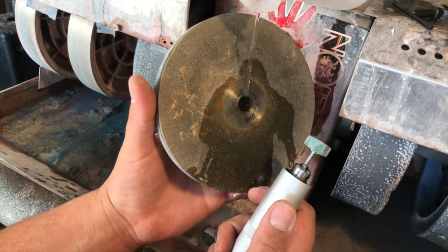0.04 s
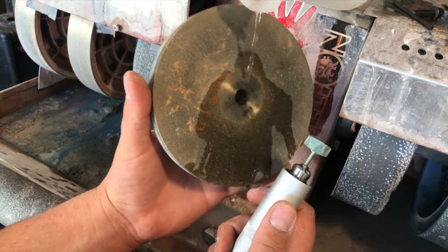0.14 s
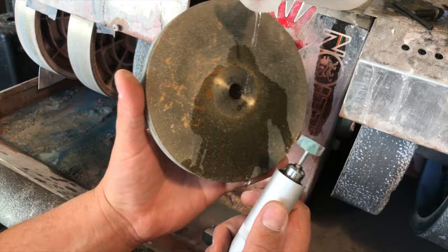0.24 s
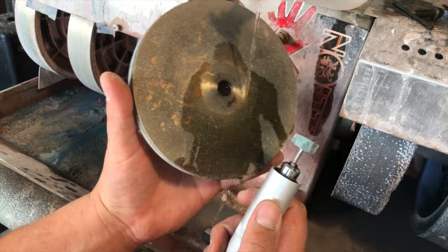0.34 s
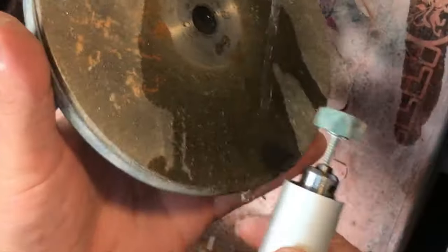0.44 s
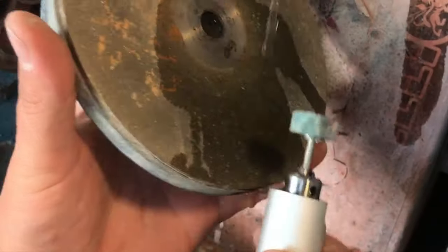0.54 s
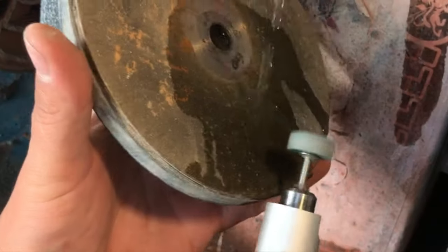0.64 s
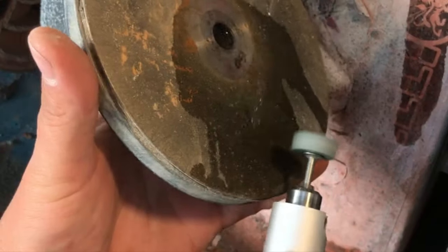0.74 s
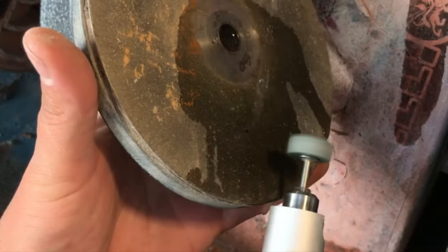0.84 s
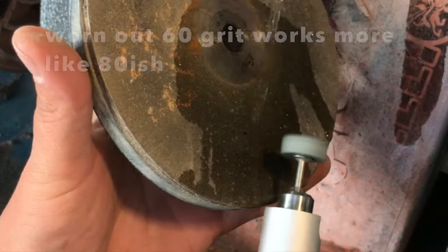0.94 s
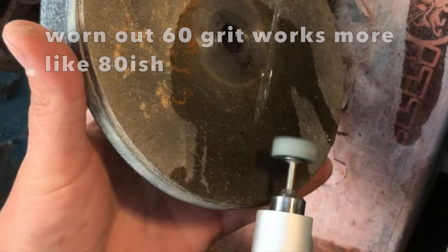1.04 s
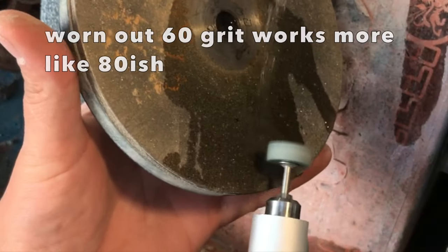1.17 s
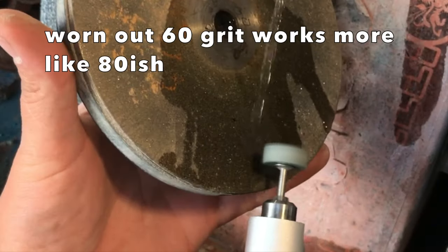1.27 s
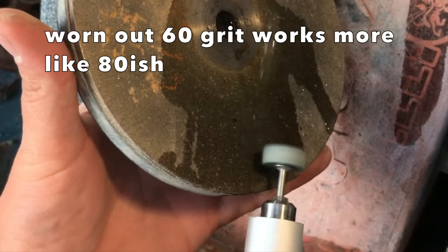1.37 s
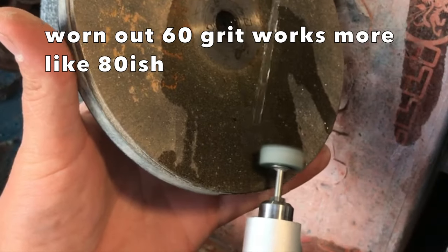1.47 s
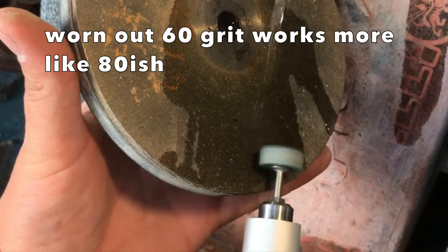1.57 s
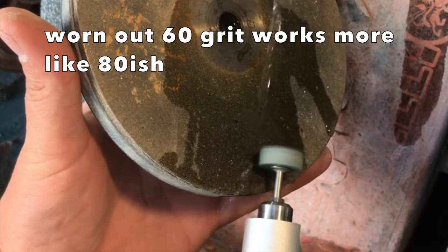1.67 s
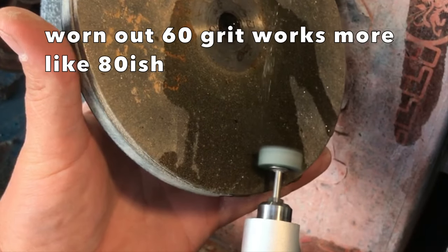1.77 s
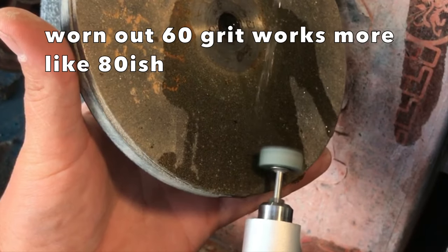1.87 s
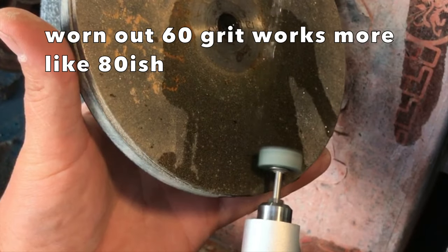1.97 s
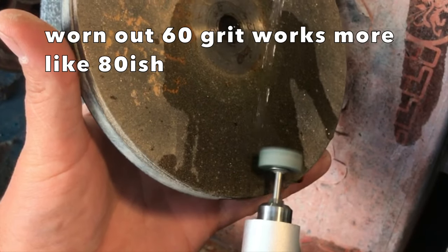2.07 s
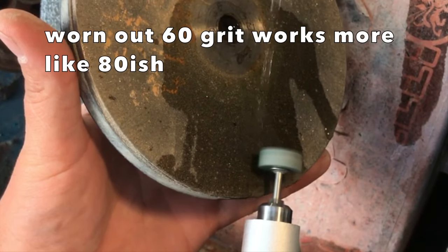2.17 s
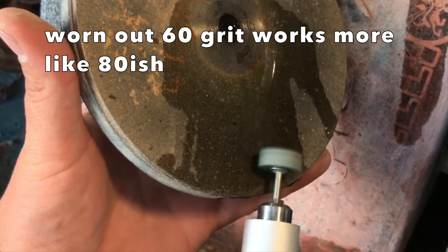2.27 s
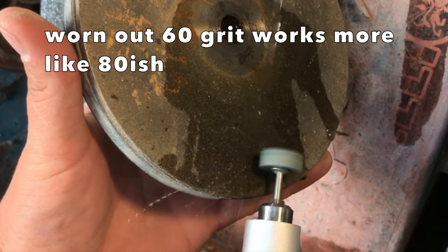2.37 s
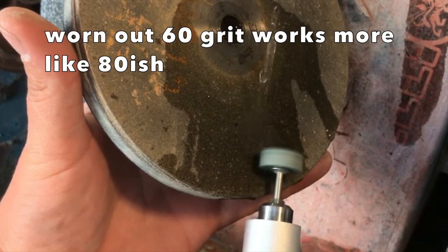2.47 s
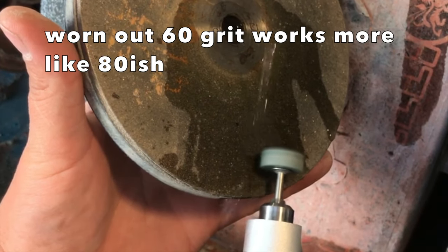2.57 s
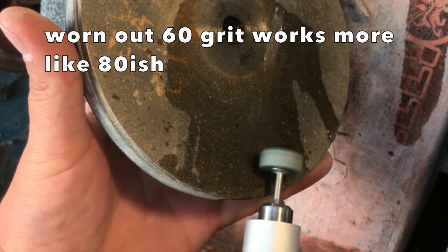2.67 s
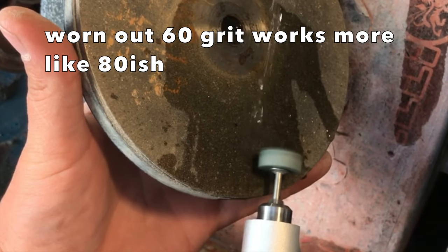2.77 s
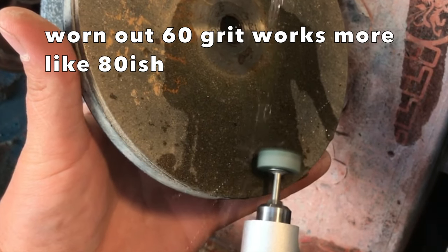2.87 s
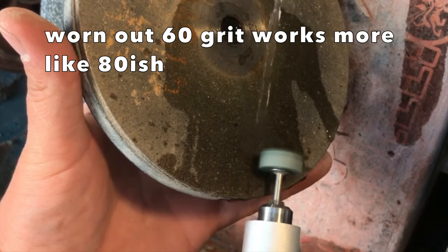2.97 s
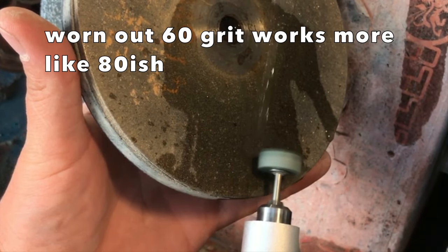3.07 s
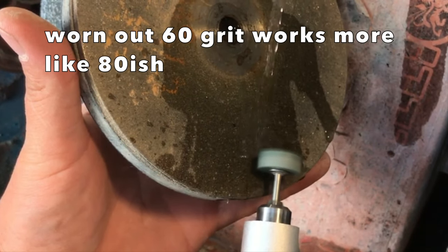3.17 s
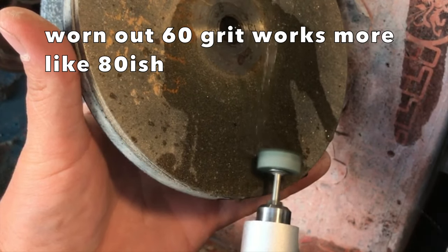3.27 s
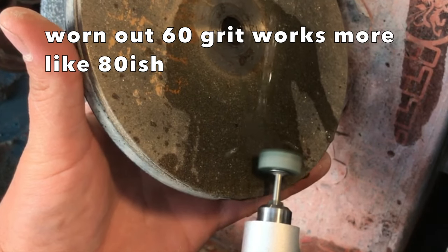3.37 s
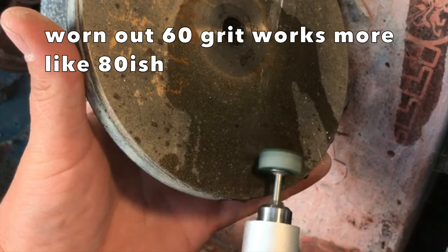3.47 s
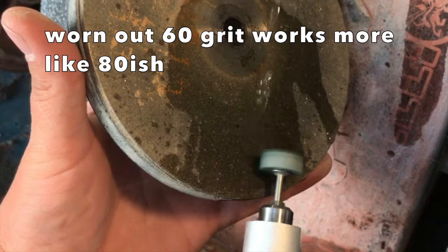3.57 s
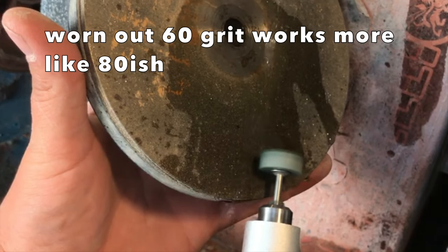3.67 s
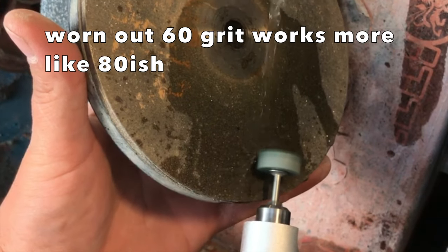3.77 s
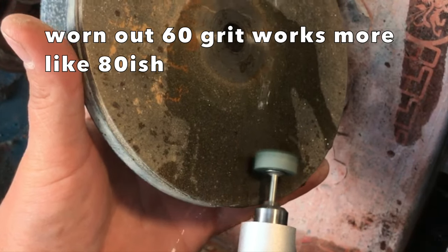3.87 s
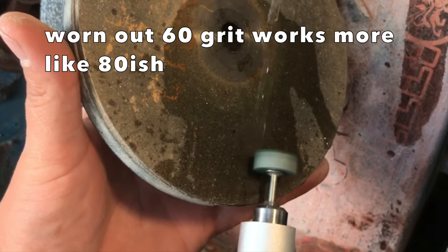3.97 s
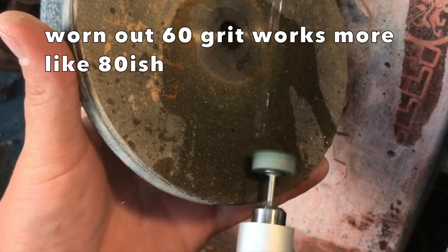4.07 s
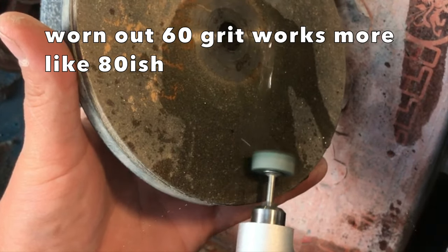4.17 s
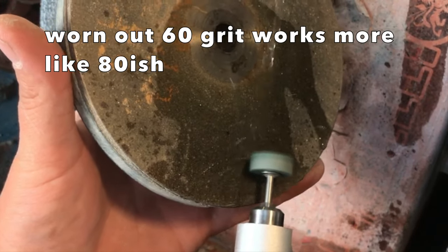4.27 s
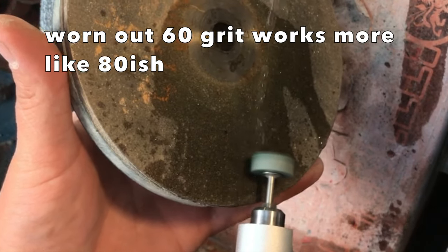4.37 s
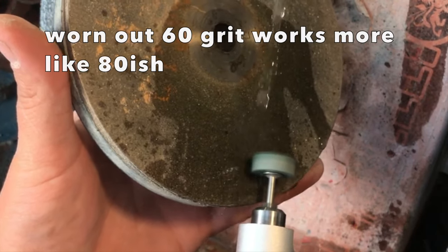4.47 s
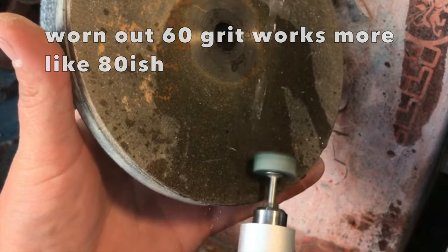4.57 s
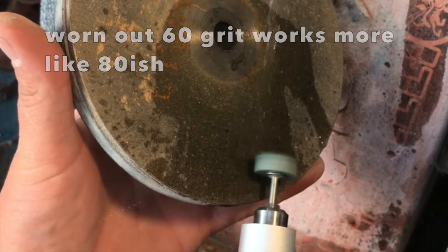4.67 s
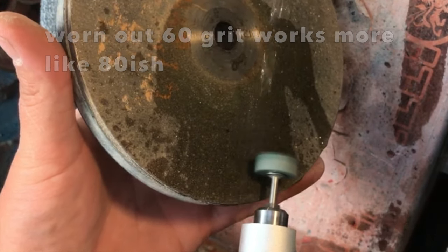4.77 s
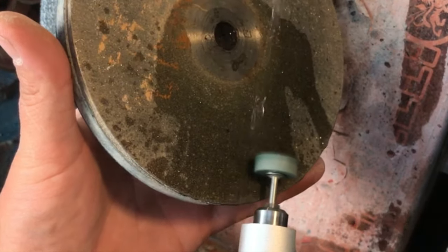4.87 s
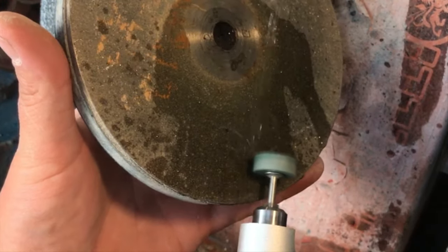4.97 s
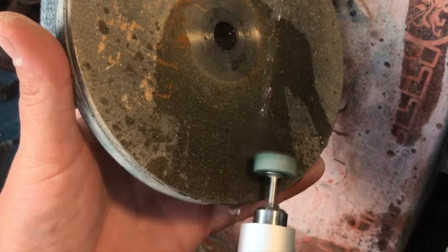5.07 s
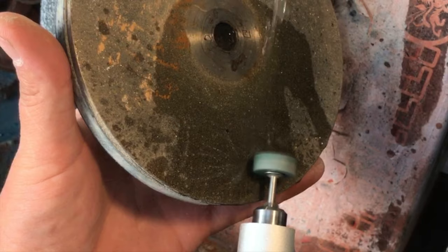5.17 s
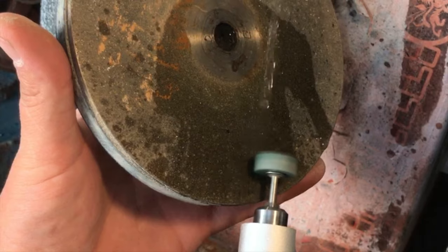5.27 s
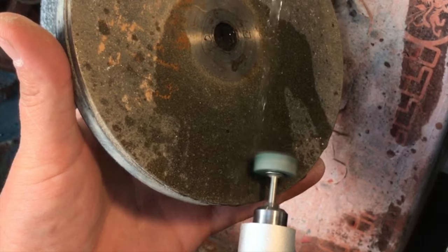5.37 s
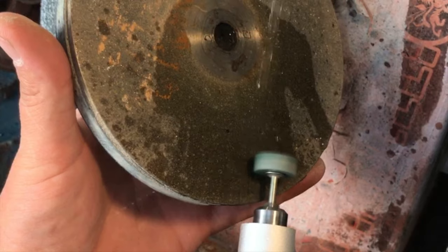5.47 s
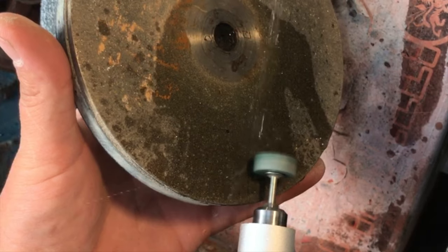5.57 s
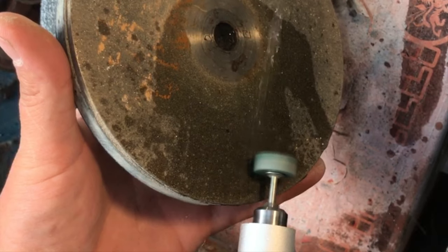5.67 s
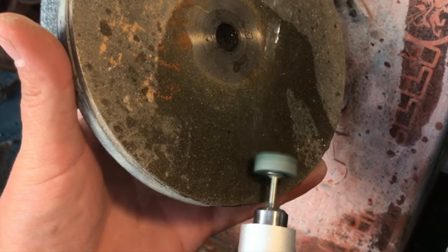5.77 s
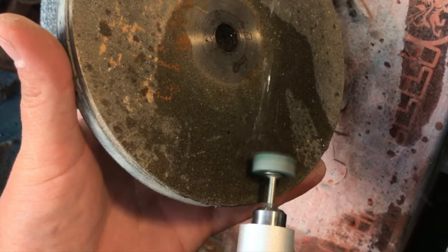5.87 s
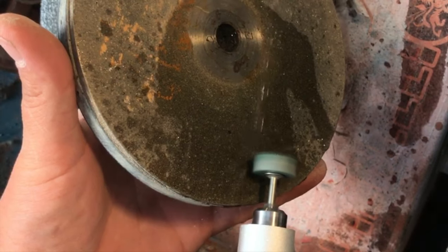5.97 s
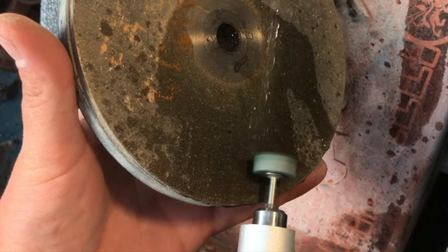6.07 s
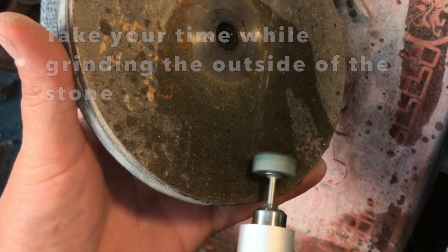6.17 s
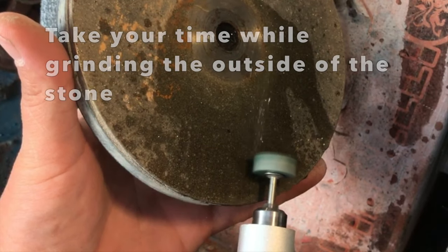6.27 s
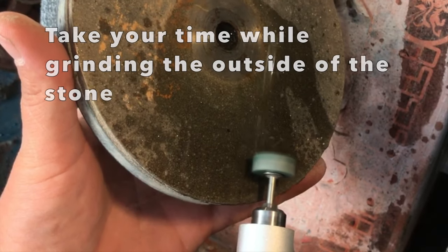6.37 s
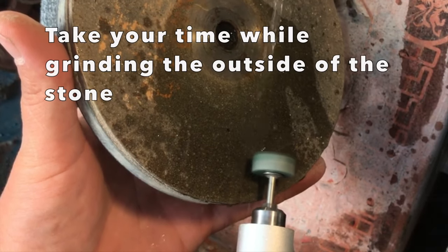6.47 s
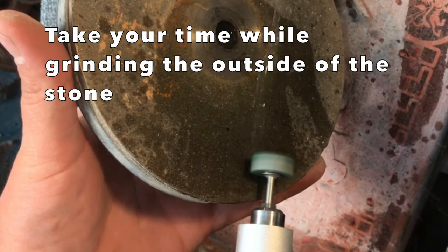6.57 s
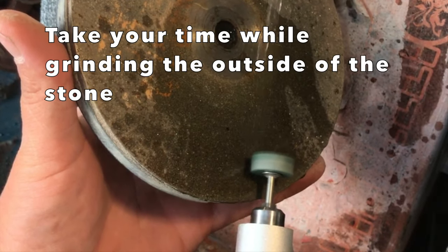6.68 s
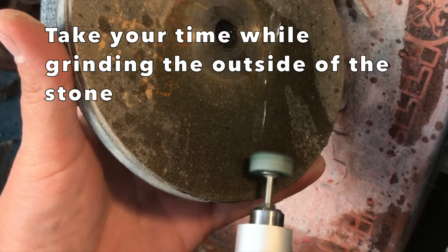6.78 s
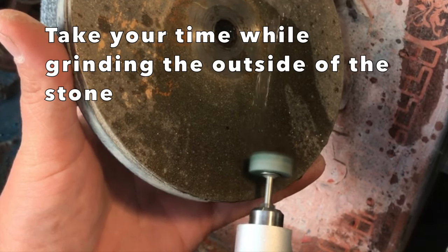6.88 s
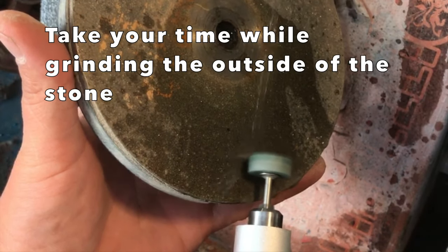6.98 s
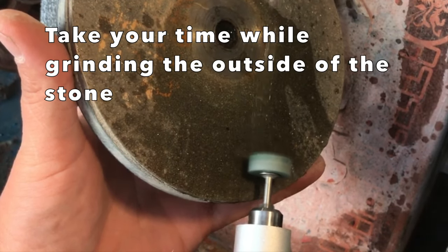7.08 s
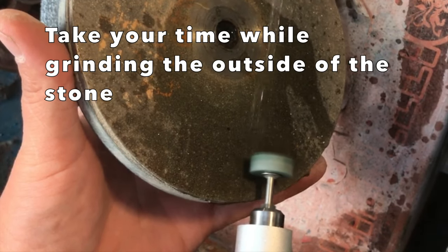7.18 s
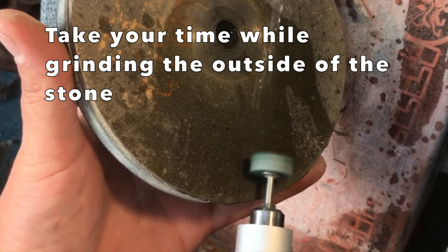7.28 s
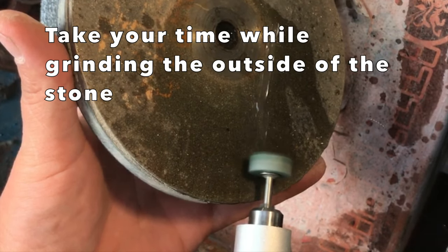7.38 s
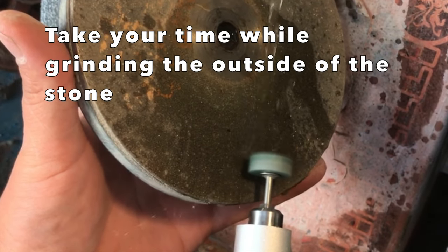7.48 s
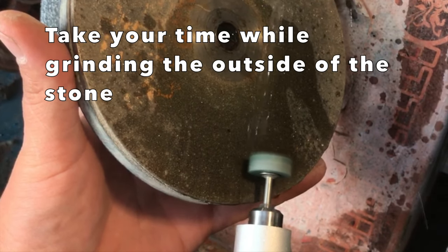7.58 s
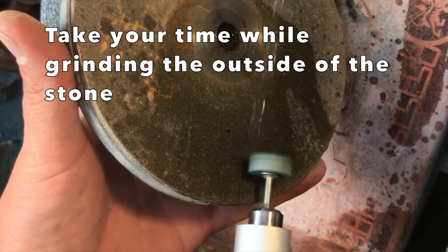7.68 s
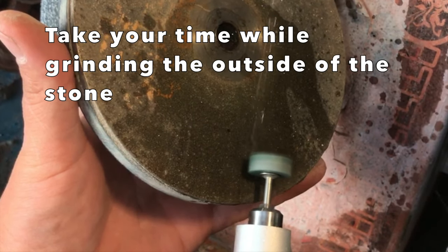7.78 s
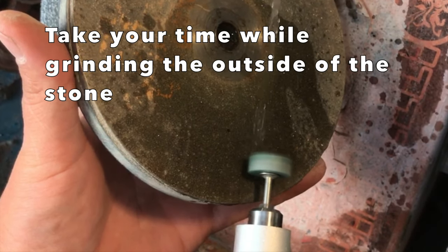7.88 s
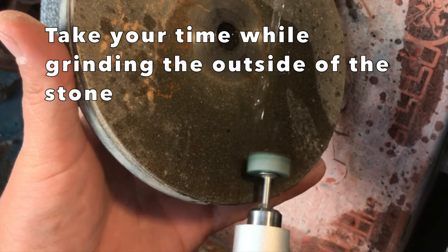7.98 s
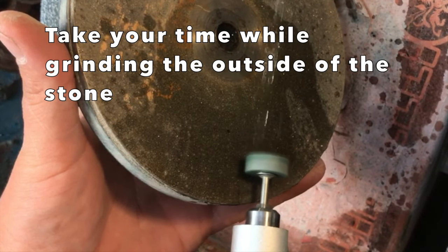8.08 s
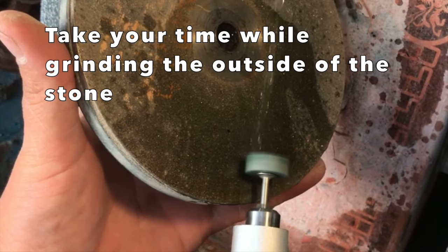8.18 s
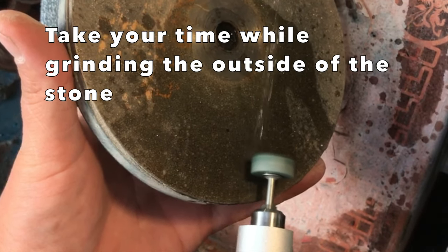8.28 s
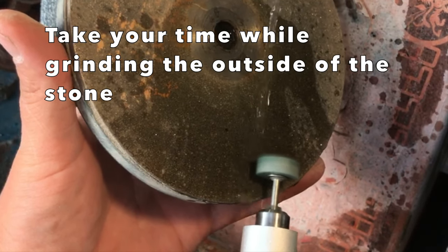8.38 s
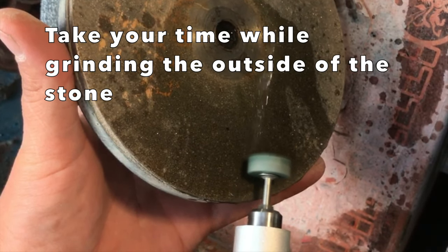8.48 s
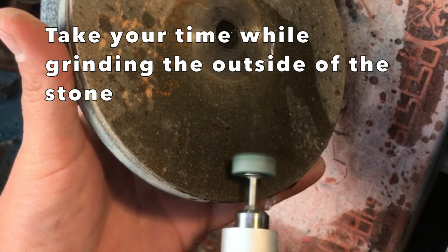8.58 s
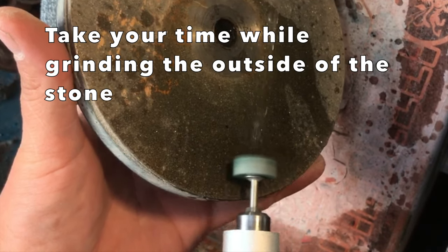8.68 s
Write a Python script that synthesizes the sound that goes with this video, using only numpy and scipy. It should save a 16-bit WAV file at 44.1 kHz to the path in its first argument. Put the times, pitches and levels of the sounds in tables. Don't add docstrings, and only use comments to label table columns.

```python
import sys
import numpy as np
from scipy import signal
from scipy.io import wavfile

SR = 44100
rng = np.random.default_rng(int(sys.argv[2]) if len(sys.argv) > 2 else 0)


def volts(x):
    e = np.asarray(x, float) / 20
    return 10 ** e


def bounce(signal):
    frames = np.transpose(np.atleast_2d(signal))
    limited = np.clip(frames, -1, 1)
    pcm = np.round(limited * 32767).astype(np.int16)
    wavfile.write(sys.argv[1], SR, pcm)


N = 384552
T = np.arange(N) / SR

# [f/Hz, level/dB, t60/s]
KNOCK_MODES = [(1560, -45, 0.11), (1659, -3, 0.066), (1713, -3.5, 0.058), (2020, -34, 0.088),
               (2033, -2.5, 0.058), (2390, -6, 0.027), (2530, 8, .014), (2398, 5, 0.016),
               (2497, 0.5, 0.022), (2716, 6, 0.027), (2890, -5, 0.029), (3160, -20, 0.056),
               (3500, 1, 0.021)]
# [f/Hz, level/dB, t60/s]
PLATE_MODES = [(3708, -10, 0.11), (4230, -1.5, 0.022), (4910, -1.5, 0.025), (4970, -8, .03),
               (5370, -26, 0.087), (6000, 3, 0.013), (6205, -3.5, 0.038), (6910, 1.5, 0.0075),
               (7720, -9, 0.028), (8120, 0, 0.025), (8590, -4, 0.052), (9130, -3.5, 0.026),
               (9460, 0, 0.035),
               (10400, -2, 0.03), (11110, -2.5, 0.025), (11270, -4.5, .025), (12760, -2.5, 0.03),
               (12880, -1.5, .025), (13320, -5, .03), (13460, 0, 0.035), (13590, -7, .03), (13690, -5, .03),
               (13850, -11, .02), (15170, -6, 0.02), (15400, -6, 0.02), (15700, -5, .02)]
# [t/s, knock level/dB]
HAND_WEIGHT = [(1.85, -37), (1.97, -30), (2.45, -27), (2.75, -36.5), (2.95, -29.5), (3.4, -36), (3.55, -31),
               (3.72, -29), (3.86, -36), (4.45, -37.5), (4.6, -32.5), (5.0, -31), (5.46, -29),
               (5.85, -31.5), (6.05, -29.5), (7.0, -30), (7.45, -28), (8.1, -32.5)]
# [f/Hz, level/dB per Hz]
SCRAPE_COLOUR = [(530, -25), (900, -56), (1670, 10.5), (1860, -4), (2400, 11.5), (3940, 4), (13200, 6),
                 (16200, -10)]


def grinding(turns):
    strike_s, scrape_db, missed_db = bouts(turns)
    at = np.round(strike_s * SR).astype(int)
    scrape_db = scrape_db + missed_db
    knock_db = columns(HAND_WEIGHT)[0][at] + 0.9 * rng.standard_normal(len(at)) + missed_db
    out = np.zeros(N + 40)
    landing_s = 0.00038
    soft = 1 - np.exp(-np.arange(3000) / SR / landing_s)
    # modes, blow level/dB, change of level with landing spot/dB, spread of delay/samples, onset
    mode_groups = (
        (KNOCK_MODES, knock_db - 11.5, 1.2, 1, soft),
        (PLATE_MODES, scrape_db - 16.0, 2.0, 14, 1))
    for modes, size_db, spot_db, spread, onset in mode_groups:
        for hz, db, t60 in modes:
            late = rng.integers(0, spread) + (hz > 3500) * rng.integers(0, 4, len(at))
            blow_db = size_db + spot_db * rng.standard_normal(len(at))
            blows = np.bincount(at + late, volts(blow_db), len(out))
            out += signal.oaconvolve(blows, volts(db) * ring(hz, t60) * onset)[:len(out)]
    t = np.arange(2000) / SR
    contact = volts(-60 * t / 0.014) + 0.12 * volts(-60 * t / 0.08)
    scrapes = np.bincount(at, volts(scrape_db), len(out))
    grit = signal.oaconvolve(scrapes, contact)[:N] * rng.standard_normal(N)
    struck = out[:N] + volts(-9.5) * coloured(grit, SCRAPE_COLOUR)
    return band(struck, lo_hz=1400, hi_hz=19200, order=3)


# [first strike t/s, length/s, flight/turns, scrape level/dB]
BOUNCES = [(1.5773, .07, 19, -23.5), (1.687, .015, 4.5, -27), (1.7566, .036, 6.5, -27),
           (1.8501, .013, 4.3, -25), (1.9289, .065, 7.5, -25.5), (2.002, .05, 5.3, -23),
           (2.0649, .062, 5.6, -25), (2.1326, .08, 7, -24), (2.2206, .055, 5.1, -25.5),
           (2.2881, .095, 7.25, -23), (2.3984, .095, 7.3, -24), (2.5109, .06, 7.2, -24),
           (2.5858, .07, 8.9, -24.5), (2.6904, .12, 7, -26.5), (2.8833, .165, 6.6, -27),
           (3.0863, .015, 5.4, -28), (3.1785, .05, 18, -25.5), (3.2451, .057, 4.4, -23.5),
           (3.3387, .03, 9, -26), (3.3757, .065, 6, -29), (3.4741, .27, 5.6, -27),
           (3.7524, .04, 6.5, -23.5), (3.8066, .1, 7.5, -21.5), (3.9907, .118, 6.7, -25),
           (4.1768, .022, 8, -22), (4.3573, .045, 15, -24), (4.4109, .11, 8.5, -21.5),
           (4.5318, .225, 4.1, -25), (4.7643, .115, 6.5, -28.5), (4.8891, .14, 5, -25)]
# [start t/s, flight/turns, scrape level/dB]
CHATTER = [(5.04, 4, -25.5), (5.14, 3.34, -26), (5.3, 4, -24.5), (5.49, 3.66, -24.5), (5.7, 3.9, -26),
           (5.82, 4.5, -23.5), (6.04, 4.5, -24.5), (6.13, 4, -23.5), (6.24, 3.95, -27.5), (6.294, 3.4, -23),
           (6.466, 3.6, -24), (6.68, 3.45, -23.5), (6.775, 4.3, -29.5), (6.88, 4.4, -21),
           (6.97, 4.6, -24.5), (7.02, 4.4, -22), (7.135, 4.9, -35), (7.195, 3.7, -24.5), (7.4, 3.96, -23.5),
           (7.575, 2.8, -23.5), (7.61, 4.04, -24), (7.705, 2.8, -20.5), (7.75, 5, -33), (7.775, 3.6, -22),
           (7.82, 2.8, -45), (7.853, 3.8, -22.5), (8.1, 3.5, -24.5), (8.275, 3.9, -26.5),
           (8.36, 3.5, -24.5), (8.55, 3.9, -22.5)]


def bouts(turns):
    start, length, flight, db = np.transpose(BOUNCES)[:, :, None]
    first, last = np.interp([start, start + length], T, turns)
    light = strikes(first, last, flight, db, turns, slip=.18, spread_db=2.1, count=24)
    start, flight, db = np.transpose(CHATTER)[:, :, None]
    first = np.round(np.interp(start, T, turns))
    last = np.append(first[1:], turns[-1])[:, None] - 1.5
    firm = strikes(first, last, flight, db, turns, slip=.42, spread_db=1.8, count=36)
    return np.hstack([light, firm])


def strikes(first, last, flight, db, turns, slip, spread_db, count):
    luck, force = rng.standard_normal((len(db), count, 2)).transpose(2, 0, 1)
    k = np.arange(count)
    landing = first + np.round(k * flight + (k > 0) * slip * luck)
    missed_db = np.where(landing < last, 0, -300)
    strike_s = np.interp(landing, turns, T)
    strike_db = db + spread_db * np.clip(force, -2.5, 1.2)
    return np.array([strike_s, strike_db, missed_db]).reshape(3, -1)


# [t/s, f/Hz]
SHAFT_SPEED = [(.59, 56), (.64, 105), (.71, 178.6), (.798, 257.7), (.86, 289.6), (.94, 316.4),
               (1.01, 336.6), (1.11, 352), (1.21, 365), (1.32, 374), (1.6, 389), (2.05, 397.8),
               (2.56, 400.5), (3.31, 403.4), (3.75, 408.3), (5.2, 408), (6.7, 407), (8.72, 407.4)]


def shaft():
    hz, = columns(SHAFT_SPEED)
    return np.cumsum(hz) / SR, hz


def motor(turns, hz):
    tones = hum(turns, hz) + order_tones(turns, hz)
    noise = whirr(turns, hz) + growl(hz)
    switched_on = np.clip((T - .575) / 0.04, 0, 1)
    return (np.sqrt(2) * tones + noise) * switched_on


# [shaft f/Hz, level/dB]
HUM = [(100, -67), (180, -61), (220, -54), (258, -39.5), (365, -42.5), (381, -50), (398, -60), (408, -60)]
# [shaft f/Hz, level/dB]
OCTAVE_HUM = [(70, -75), (160, -53), (210, -42.5), (275, -61), (397, -58.5), (404, -69), (408, -74)]


def hum(turns, hz):
    once = volts(read(HUM, hz) + 1.4 * wander(hz=25.4)) * np.sin(2 * np.pi * turns + 0.083 * wander(hz=17))
    twice = volts(read(OCTAVE_HUM, hz) + 0.5 * wander(hz=53)) * np.sin(4 * np.pi * turns)
    mains_db = -73 + 25.4 * np.exp(-abs(T - .7) / 0.23) + 1.4 * wander(hz=19.0)
    return once + twice + volts(mains_db) * np.sin(2 * np.pi * 180.5 * T)


# [multiple, level/dB]
LOW_ORDERS = [(3, -0.5), (4, 5.5), (5, 1), (6, 0.5), (7, 3), (8, 5), (9, 4)]
# [shaft f/Hz, level/dB]
LOW_HUM = [(130, -83), (258, -61.5), (290, -75), (336, -56.5), (395, -67.5), (402, -66.5)]
# [multiple, level/dB]
BAR_ORDERS = [(11, -12), (11.5, -5), (12, 0), (12.6, -3), (13, -11)]
# [shaft f/Hz, level/dB]
BAR_WHINE = [(105, -57), (200, -63), (258, -42), (290, -49), (385, -49), (400, -54), (408, -60.5)]
# [multiple, level/dB]
BAR_OVERTONES = [(24, 0), (48, 1)]
# [f/Hz, level/dB]
ZIP = [(2500, -82), (3400, -56), (5300, -53), (6500, -72), (8000, -61), (15000, -59)]


def order_tones(turns, hz):
    zip_end_s, zip_fade_db_per_s = .95, 80
    drown_db = zip_fade_db_per_s * np.clip(T - zip_end_s, 0, 1)
    families = (  # orders, level/dB of order k, phase blur/rad
        (LOW_ORDERS, lambda k: read(LOW_HUM, hz), .3),
        (BAR_ORDERS, lambda k: read(BAR_WHINE, hz), .3),
        (BAR_OVERTONES, lambda k: read(ZIP, k * hz) - drown_db, 1.6))
    tones = np.zeros(N)
    for orders, level_db, blur in families:
        for k, db in orders:
            gain = volts(db + level_db(k) + 3.15 * wander(hz=30.2))
            phase = 2 * np.pi * k * turns + blur * wander(hz=30 + 12 * blur ** 2)
            tones += gain * np.sin(phase)
    return tones


# [f/Hz, level/dB per Hz]
WHIRR_COLOUR = [(290, -76), (500, -19), (988, -2.5), (2130, -6.5), (3290, -2.5), (3440, -7.5), (5160, -3.5),
                (5800, -9.5), (6800, -5), (9920, -5), (11500, -7.5), (14200, -7.5), (16000, -14)]
# [f/Hz, width/Hz, level/dB]
CASING = [(1015, 18, 2.5), (2310, 12, 7.5), (2633, 12, 8.5), (3400, 22, -36.5), (4730, 38, -24),
          (6400, 500, 1.5), (8440, 520, -5), (9200, 67, 1.5), (11240, 210, 2)]
# [t/s, peak level/dB, rise/s, fall/s]
EASING = [
    (3.15, -41.5, 0.31, 0.66),
]


def whirr(turns, hz):
    contact_s, seating_s = 1.45, 0.83
    free = np.clip(1 - (T - contact_s) / seating_s, 0, 1)
    speed = hz / hz[-1]
    gain = volts(-42.5 + 6.5 * free) * speed ** 0.83 * np.clip(hz / 150, 0, 1) ** 2
    gain = gain + swells(EASING) / 2
    throb = 1 + 0.13 * np.cos(2 * np.pi * turns)
    noise = coloured(throb * rng.standard_normal(N), WHIRR_COLOUR, CASING, peaks_db=6.5)
    dull_db = -7.5 * (1 - speed ** 2)
    noise -= band(noise, lo_hz=5060, hi_hz=19000, order=1) * (1 - volts(dull_db))
    return gain * volts(1.1 * wander(hz=28.4)) * noise


# [f/Hz, level/dB per Hz]
GROWL_COLOUR = [(41, -48), (70, -12), (108, -14.5), (163, -11), (221, -16.5), (278, -5.5), (339, -10.5),
                (360, -11.5), (386, -2), (405, -15), (430, -11.5), (466, -12), (750, -23), (980, -31),
                (1650, -120)]
# [t/s, peak level/dB, rise/s, fall/s]
JOLTS = [
    (6.29, -61, .02, 0.016),
]


def growl(hz):
    peak_hz, width_hz = 236, 103
    shake_db = -64 + 16.5 / (1 + ((hz - peak_hz) / width_hz) ** 4)
    return (volts(shake_db) + swells(JOLTS)) * coloured(rng.standard_normal(N), GROWL_COLOUR)


def hands():
    return handling() + creaking() + ticking()


# [t/s, peak level/dB, rise/s, fall/s]
BUMPS = [
    (0, -50, .1, .1),
    (.18, -54, 0.036, 0.082),
    (.342, -37, 0.022, .012),
    (.395, -40, 0.015, 0.03),
    (.62, -60, .03, .05),
    (.91, -77, .08, 0.064),
    (1.5, -73, .3, .4),
    (5.96, -59, .05, .05),
    (8.36, -73, 0.08, 0.07),
]
# [t/s, peak level/dB, rise/s, fall/s]
RUSTLES = [
    (.15, -57, 0.055, 0.022),
    (.43, -60, .03, 0.064),
    (.62, -50, 0.0067, 0.068),
]
# [f/Hz, level/dB per Hz]
RUSTLE_COLOUR = [(71, -28), (120, -4.5), (272, -14.5), (341, -11.5), (378, -13), (493, -18), (1030, -18.5),
                 (5750, -24.5), (16000, -28)]


def handling():
    rumble = evened(band(rng.standard_normal(N), lo_hz=20, hi_hz=44.2))
    air = volts(1.0 * wander(hz=39.8)) * coloured(rng.standard_normal(N), RUSTLE_COLOUR)
    cloth = band(air, lo_hz=100, hi_hz=6600)
    before = np.clip((.66 - T) / 0.0086, 0, 1)
    return (volts(-76.5) + swells(BUMPS)) * rumble + before * (volts(-60.5) * air + swells(RUSTLES) * cloth)


# [t/s, peak level/dB, rise/s, fall/s]
CREAKS = [
    (.344, -53, .004, .02),
    (.395, -46, 0.013, .018),
]


def creaking():
    low = band(rng.standard_normal(N), lo_hz=460, hi_hz=544)
    high = band(rng.standard_normal(N), lo_hz=610, hi_hz=670)
    return swells(CREAKS) * evened(low + .7 * high)


# [t/s, peak level/dB, ring f/Hz, ring t60/s, snap level/dB]
TICKS = [
    (.125, -40, 7000, 0.011, -52),
    (0.16, -40.5, 5570, 0.049, -44),
    (.484, -48, 800, 0.04, -43),
    (.515, -63, 780, .04, -75),
    (0.613, -43, 8100, .01, -39),
    (0.638, -34, 1400, 0.062, -30),
    (.795, -31.5, 430, 0.08, -41),
]


def ticking():
    out = np.zeros(N)
    t = np.arange(3000) / SR
    for s, db, hz, t60, snap_db in TICKS:
        decay = volts(snap_db - 60 * t / (0.015 + 0.92 * t60))
        snap = band(rng.standard_normal(len(t)), 0.62 * hz, min(4.2 * hz, 15500)) * decay
        at = round(s * SR)
        out[at:at + len(t)] += volts(db) * (ring(hz, t60) + .5 * ring(1.14 * hz, t60)) + snap
    return out


def evened(x):
    return x / np.sqrt(np.mean(x ** 2) + 1e-20)


def columns(rows):
    s, *values = np.transpose(rows)
    return [np.interp(T, s, v) for v in values]


def read(points, hz):
    f, db = np.transpose(points)
    return np.interp(np.log(hz), np.log(f), db)


def swells(rows):
    return sum(volts(db) * np.exp(np.minimum((T - s) / rise, (s - T) / fall)) for s, db, rise, fall in rows)


def coloured(x, points, peaks=(), peaks_db=0.):
    hz = np.fft.rfftfreq(8192, 1 / SR)
    f, db = np.transpose(points)
    gain = volts(np.interp(np.log(hz + 1), np.log(f + 1), db, left=-90, right=-90))
    lift = sum(volts(2 * (d + peaks_db)) / (1 + (2 * (hz - p) / w) ** 2) for p, w, d in peaks)
    level = np.log(gain * np.sqrt(1 + lift) + 1e-5)
    full = np.concatenate([level, level[-2:0:-1]])
    taps = np.fft.ifft(np.exp(np.conj(signal.hilbert(full)))).real[:4096]
    return signal.oaconvolve(x, taps / np.linalg.norm(taps))[:N]


def band(x, lo_hz, hi_hz, order=2):
    return signal.sosfilt(signal.butter(order, [lo_hz, hi_hz], "band", fs=SR, output="sos"), x)


def wander(hz):
    return evened(signal.sosfilt(signal.butter(2, hz, fs=SR, output="sos"), rng.standard_normal(N)))


def ring(hz, t60, size=3000):
    t = np.arange(size) / SR
    return volts(-60 * t / t60) * np.sin(2 * np.pi * hz * t)


def scene():
    turns, hz = shaft()
    return np.tile(grinding(turns) + motor(turns, hz) + hands(), (2, 1))


def roll_off(x):
    return signal.sosfilt(signal.butter(12, 16690, fs=SR, output="sos"), x)


def record(dry):
    edge = signal.firwin(767, 15790, window=("kaiser", 8), fs=SR)
    mix = signal.oaconvolve(dry, edge[None], "same")
    return roll_off(mix)


dry = scene()
out = record(dry)
bounce(out)
```